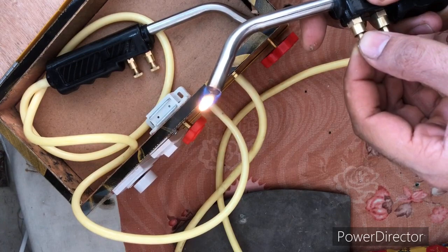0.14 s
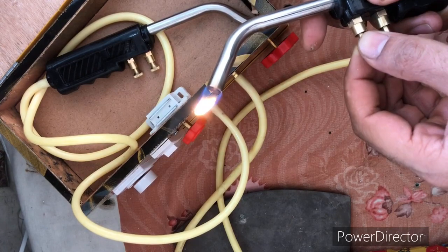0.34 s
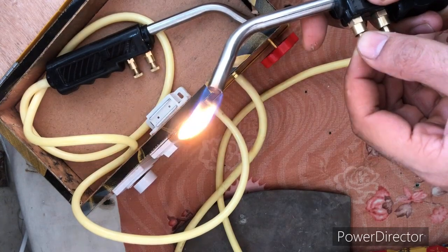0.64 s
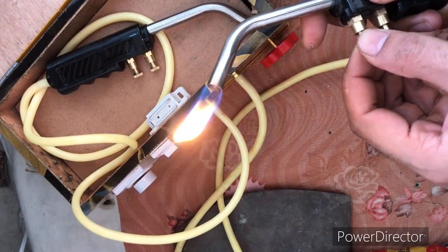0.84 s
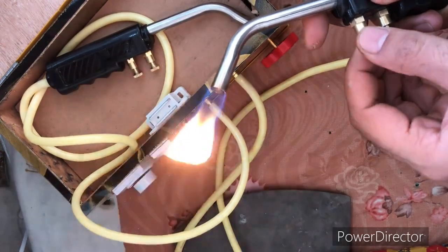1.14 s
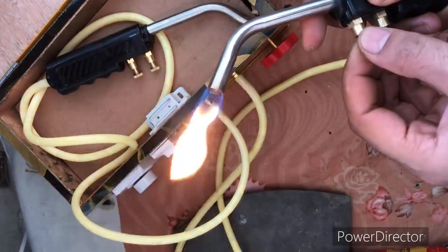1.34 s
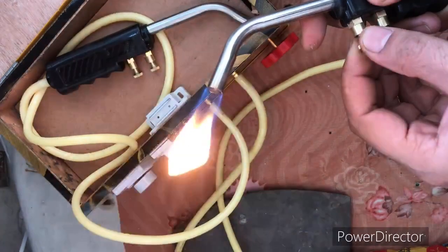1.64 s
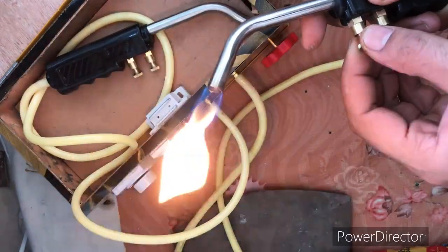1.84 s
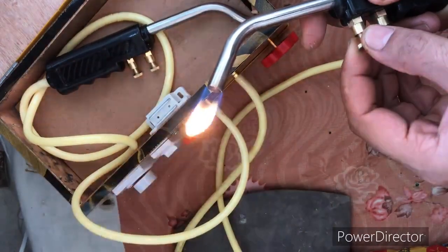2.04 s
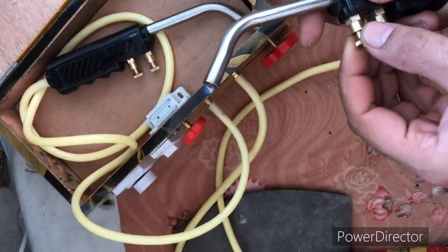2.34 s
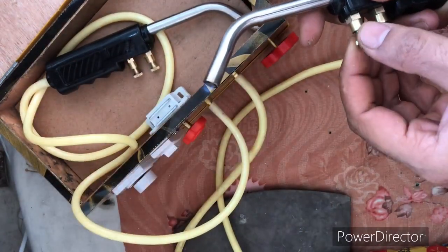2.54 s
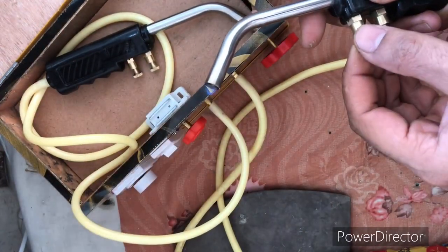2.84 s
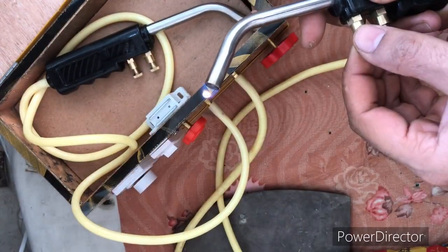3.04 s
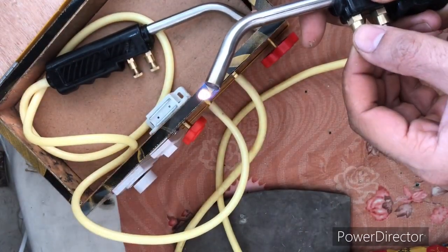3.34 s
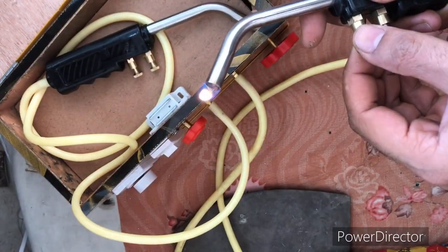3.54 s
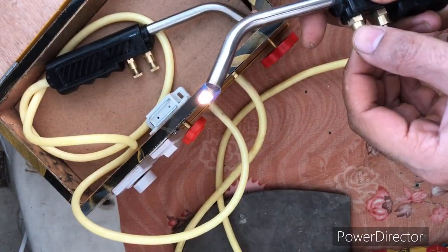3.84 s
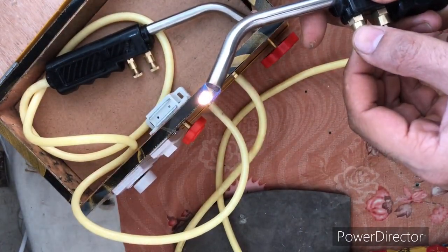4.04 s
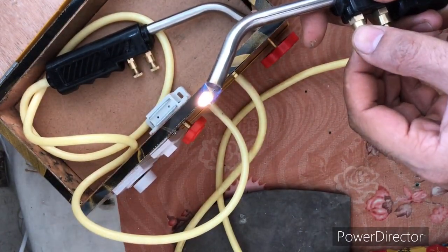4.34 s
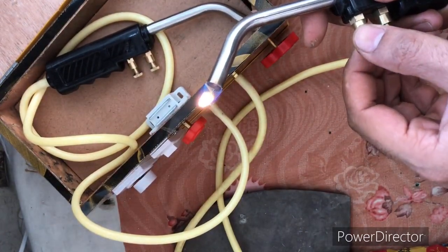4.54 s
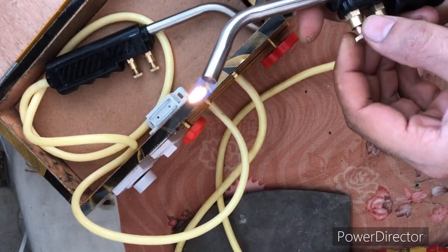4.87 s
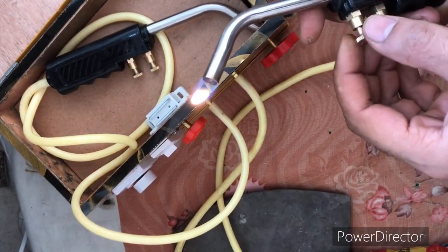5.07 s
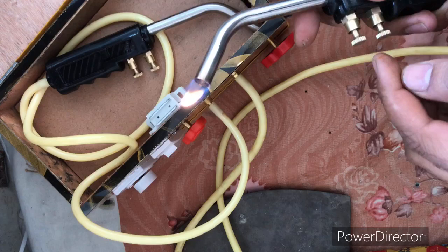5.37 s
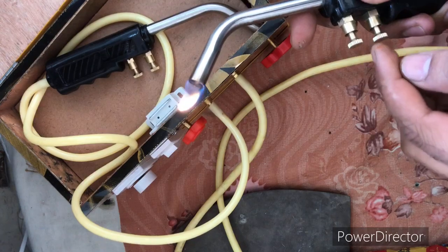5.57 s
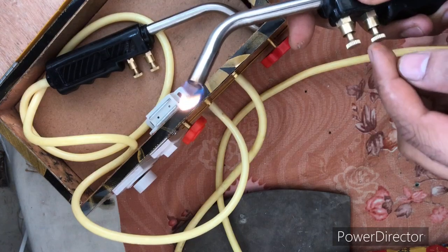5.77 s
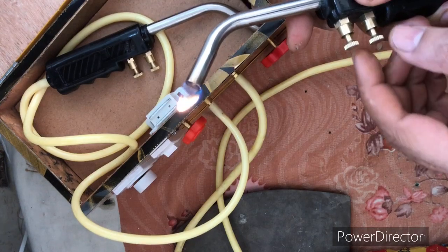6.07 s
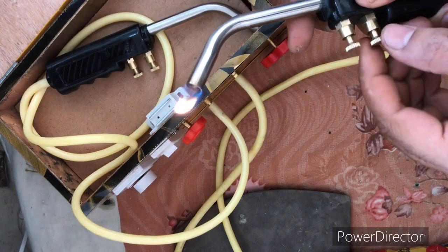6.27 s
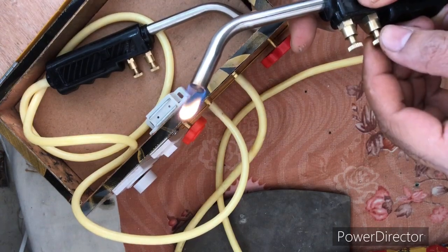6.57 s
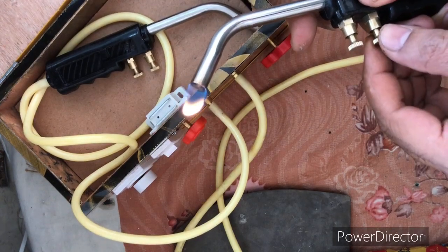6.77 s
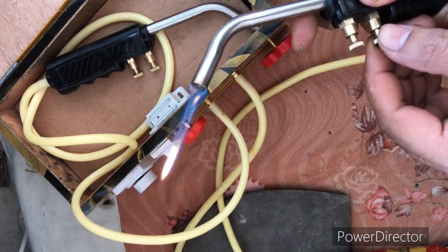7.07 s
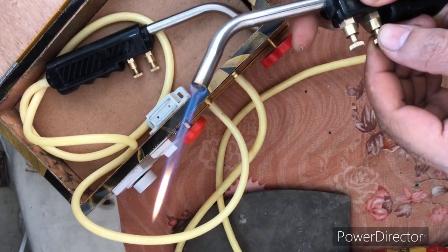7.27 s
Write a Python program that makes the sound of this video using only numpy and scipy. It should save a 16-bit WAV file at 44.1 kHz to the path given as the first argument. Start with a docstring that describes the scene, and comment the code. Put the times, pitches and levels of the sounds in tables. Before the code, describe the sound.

A gas torch is heard close, dry and in mono, over a continuous deep drone around 60 to 70 hertz, like a distant engine, beating against a steady mains pump hum. At about 0.35 s a short uneven rush of gas swells; from 0.5 to 2 s very faint high whistles accompany a buzzing, hollow ring of the burner tube around 690 hertz. Ragged low puffs flutter near 1.9 to 2.1 s, with a small one at 2.35. The drone dips near 2.7, then is strongest around 3.9 to 4.5 s, while another tube ring rises at 3.3 and fades by 4.5. The airy hiss and roar thicken gradually. After 5.2 s the drone sits lower and rougher, with a soft midrange swell. Around 6.6 s the nozzle briefly sings breathily; from 6.8 the tube rings again as the flame becomes a strong tearing jet until 7.4 s.

```python
"""A hand torch hisses and roars close up, from coloured noise, over a low sine drone like a distant engine.
First a valve lets out a rush of gas, then whistles as narrow noise bands while the flame lengthens and shrinks.
From 2.7 s the flame stretches, ever faster, into a tearing jet; ragged puffs and longer swells come and go.
The drone climbs, sinks and gains idle partials after 5.2 s; near 6.6 s the nozzle sings in a brief swell.
Throughout, a mains-driven pump hums and buzzes in mains harmonics, and the burner tube rings with its strokes."""
import sys
import numpy as np
from scipy import signal
from scipy.fft import rfft, irfft, next_fast_len
from scipy.io import wavfile

SR = 44100
rng = np.random.default_rng(int(sys.argv[2]) if len(sys.argv) > 2 else 0)


def inscribe(sig):
    """Save sig as 16-bit PCM at rate SR to the path in sys.argv[1].

    A 1-D sig is mono; a 2-D sig holds one channel per row.
    Samples are clipped to [-1, 1] before scaling.
    """
    pcm = np.round(np.clip(np.atleast_2d(sig).T, -1, 1) * 32767)
    wavfile.write(sys.argv[1], SR, pcm.astype(np.int16))


N = 326781
TIME = np.arange(N) / SR   # s

# Distant engine. Each row: time in seconds, firing rate in Hz, level in dB.
ENGINE_RUN = [(0, 63.1, -42.5), (.2, 62.8, -33), (.75, 68.2, -31.5), (1.3, 69.3, -33.5), (2.0, 69.6, -37.5),
              (2.2, 69.12, -33), (2.65, 70.85, -46), (3.0, 72, -39), (3.55, 73.6, -38.5),
              (3.85, 69.46, -28.5), (4.55, 66.77, -28), (4.9, 65.84, -34.5), (5.2, 63, -34.5),
              (5.45, 61.4, -32.5), (5.75, 59.86, -34.5), (6.45, 60.24, -31), (7.41, 60.1, -32.5)]
# Partials at idle. Each row: multiple of half the firing rate, level in dB against the firing tone.
IDLE_PARTIALS = [(1, -27), (3, -6)]
IDLE_START_S, IDLE_EDGE_S = 5.24, 0.21

MAINS_HZ = 50.04
# The pump's own hum. Each row: multiple of the mains, dB with a small flame, dB with a long flame.
PUMP_HUM = [(1, -28, -25.5), (2, -45, -44.5), (4, -53.5, -61), (11, -55, -64)]
# Buzz that the strokes drive in the flame. Each row: multiple of the mains, dB with a small flame,
# dB with a long flame, both before the buzz level of FLAME_SHAPE.
FLAME_BUZZ = [(5, -69, -60), (6, -61, -52.5), (7, -54.5, -55), (8, -78, -65.5), (9, -72.5, -71),
              (10, -62, -57), (12, -61, -57.5), (15, -61, -56), (16, -70, -64), (18, -61, -58),
              (19, -66.5, -53), (20, -66, -60.5), (21, -70, -71.5), (22, -68, -61), (24, -75, -79)]
# The burner tube catches and rings. Each row: start in seconds, end in seconds, attack in seconds,
# resonance at the start in Hz, level in dB at the start, fade in dB per second.
TUBE_RINGS = [(.08, .41, 0.12, 679, -55, 0), (0.495, 1.985, 0.19, 692.6, -46.5, 7),
              (1.953, 2.25, .1, 692, -47.5, 11), (3.275, 4.502, 0.35, 687, -45.5, 17),
              (6.8, 7.602, 0.32, 694, -49, 4)]
RING_RELEASE_S, RING_SAG_HZ_PER_S = 0.25, 19.4   # while it rings, its resonance sinks
TUBE_REST_HZ, TUBE_REST_DB = 666.5, -55.5   # it always rings faintly
TUBE_OPEN_HZ, TUBE_OPEN_S, TUBE_OPEN_TAKES_S = 683, 4.6, 0.5   # the faint ring moves up to here

# Puffs and longer swells of resonant noise in the flame and tube. Each row: peak time in seconds,
# length (Gaussian spread) in seconds, centre in Hz, width in Hz, level in dB.
NOISE_PUFFS = [(.29, 0.12, 135, 59.6, -44), (.32, 0.072, 1100, 600, -58), (1.901, 0.028, 176, 59.6, -40),
               (1.91, 0.032, 348, 77, -40), (2.053, 0.11, 765, 323, -47), (2.074, .045, 172, 60, -41.5),
               (2.343, 0.028, 652, 90, -53), (4.146, 0.15, 625, 40, -54.5), (5.45, 0.41, 450, 111, -54),
               (6.353, 0.39, 123, 69.93, -46)]

# Spectrum of the valve's rush of gas. Each row: frequency in Hz, relative dB per Hz.
RUSH_SPECTRUM = [(900, -20), (2000, -5), (3500, 1), (6000, -7), (7500, -22), (12000, -27)]
RUSH_PEAK_S, RUSH_RISE_S, RUSH_FALL_S, RUSH_DB = 0.35, 0.16, 0.1, -60
# Whistle modes of the nearly shut valve. Each row: centre in Hz, width in Hz, relative level in dB.
WHISTLE_MODES = [(4590, 130, -5), (5900, 250, -8), (8600, 90, -16), (12000, 160, -4), (14100, 130, -4),
                 (15300, 220, 0)]
# When it whistles. Each row: start in seconds, end in seconds, level in dB.
WHISTLING_SPELLS = [(.52, 1.19, -72), (1.3, 2.0, -70)]
WHISTLING_EDGE_S = 0.12

# Modes in which the nozzle sings. Each row: centre in Hz, width in Hz, relative level in dB.
SINGING_MODES = [(418, 42, -10), (960, 21, 1), (1360, 110, -7)]
SING_DB, SING_STRETCHED_DB = -66, -56.5   # always faint; added as the flame stretches
SING_START_S, SING_END_S, SING_EDGE_S, SING_SWELL_DB = 6.47, 6.77, 0.089, -56

# Flame spectra, from the low rumble up to the fine hiss. Each row: frequency in Hz, relative dB per Hz.
RUMBLE_SPECTRUM = [(15, -32), (32, -15), (45, -2.5), (65, 8), (85, -1), (110, -0.5), (140, -5.5),
                   (185, -9.5), (225, -21.5), (400, -32)]
ROAR_SPECTRUM = [(150, -35), (240, -1.5), (340, 0), (420, -5.5), (490, 1.5), (630, -1.5), (820, -4),
                 (960, -1.5), (1170, -7), (1450, -6), (1850, -11), (2200, -21), (3000, -29.5)]
JET_SPECTRUM = [(1200, -3.5), (2100, 0.5), (2700, -2), (3350, 1.5), (4100, -5), (4900, -9.5), (5500, -8),
                (6300, -6.5), (7100, -12), (7800, -21), (10000, -56)]
HISS_SPECTRUM = [(5000, -8), (7500, -3.5), (8600, 0.5), (9800, 0), (10400, -4), (11200, -.5), (13000, -0.5),
                 (14600, -1), (15600, 2)]
# Spectrum of the long tearing jet. Each row: frequency in Hz, relative dB per Hz.
TEARING_SPECTRUM = [(250, -7.5), (400, 2), (600, -1.5), (800, -1), (1350, -1), (1850, -4.5), (2200, -8.5),
                    (2700, -7), (3600, -16), (4800, -18.5), (5500, -16.5), (6500, -34)]
# Gas flow, of which only the swing about its mean counts. Each row: time in seconds, level in dB.
GAS_FLOW = [(0.6, -65), (1.16, -64.5), (2.15, -59.5), (2.24, -61), (3.19, -57), (4.63, -54.5), (5.9, -57.5),
            (6.76, -56), (7.3, -53)]
# The flame. Each row: time in seconds, length from 0 to 1, level of its buzz in dB.
FLAME_SHAPE = [(.45, 0, 1), (.95, 0.78, -1), (1.95, 0.59, 1), (2.45, 0.03, -4), (3.35, 0.1, -10),
               (3.9, 0.01, -1.5), (4.5, 0, -1.5), (5.1, 0, 3), (6.7, 0.01, 1), (7.1, 0.47, 2.5)]
# level at mean flow, and the share of the flow's dB swing that the layer follows
ROAR_DB, ROAR_FOLLOWS = -49.5, 0.57
JET_DB, JET_FOLLOWS = -57.5, 0.92
HISS_DB, HISS_FOLLOWS = -66, 0.71
RUMBLE_DB, LONG_FLAME_RUMBLE_DB = -38, -4.5   # with a small flame; change at length 1
STRETCH_START_S, STRETCH_POWER, TEARING_DB = 2.66, 2.17, -46   # full stretch comes at the very end
STRETCH_ROAR_DB, STRETCH_JET_DB, STRETCH_HISS_DB = -4, -3, 1.0   # changes at full stretch

CUTOFF_HZ = 15780


def from_db(db):
    """Decibels to gain."""
    return 10 ** (np.asarray(db) / 20)


def rms_one(x):
    """Scale to rms 1."""
    return x / np.sqrt(np.mean(x ** 2) + 1e-20)


def in_time(rows):
    """Draw each column of a curve table out to every sample."""
    seconds, *columns = np.transpose(rows)
    return [np.interp(TIME, seconds, column) for column in columns]


def rise(start, length):
    """A smooth step from 0 to 1."""
    return np.sin(np.pi / 2 * np.clip((TIME - start) / length, 0, 1)) ** 2


def held(start, end, attack, release):
    """Attack, hold, and a release centred on the end."""
    return rise(start, attack) * (1 - rise(end - release / 2, release))


def coloured(gain_at):
    """Noise of rms 1 whose spectrum follows a function of frequency."""
    size = next_fast_len(N)
    hz = np.maximum(np.arange(size // 2 + 1) * SR / size, 1)
    spectrum = rfft(rng.standard_normal(size)) * gain_at(hz)
    return rms_one(irfft(spectrum, size)[:N])


def shaped_noise(spectrum):
    """Turbulence with a given spectrum, falling away beyond its ends."""
    points, db = np.transpose(spectrum)

    def gain_at(hz):
        skirts = np.minimum(1, np.minimum(hz / points[0], points[-1] / hz)) ** 2
        return from_db(np.interp(np.log(hz), np.log(points), db)) * skirts
    return coloured(gain_at)


def resonant_noise(centre_hz, width):
    """Turbulence through one resonance, about its width across at the -3 dB points."""
    return coloured(lambda hz: 1 / (1 + ((hz - centre_hz) / (0.75 * width)) ** 2))


def drift(rate):
    """Slow random wander of rms 1, changing about rate times a second."""
    return coloured(lambda hz: 1 / (1 + (hz / rate) ** 4))


def tone(turns):
    """A sine of rms 1 that starts anywhere in its cycle."""
    return np.sqrt(2) * np.sin(2 * np.pi * (turns + rng.random()))


def engine(unsteady_db=1.0):
    """Only the lowest partials of the engine carry this far; they beat against the pump's hum."""
    firing_hz, level_db = in_time(ENGINE_RUN)
    turns = np.cumsum(firing_hz) / SR
    partials = sum(from_db(db) * tone(round(k) * turns / 2) for k, db in IDLE_PARTIALS)
    idling = rise(IDLE_START_S, IDLE_EDGE_S) * partials
    return from_db(level_db + unsteady_db * drift(rate=10.5)) * (tone(turns) + idling)


def stroke_phases(orders, db):
    """Phase of each harmonic of a pulse that starts sharply and rings out (minimum phase)."""
    log_gain = np.log(from_db(np.interp(np.arange(max(orders) + 1), orders, db)))
    mirrored = np.r_[log_gain, log_gain[-2:0:-1]]
    return -np.imag(signal.hilbert(mirrored))


def tube(harmonics, width_hz=22):
    """The burner tube lifts the stroke harmonics nearest its resonance, which sinks in each ring."""
    def ring(hz):
        lifts = {k: 1 / (1 + ((k * MAINS_HZ - hz) / width_hz) ** 2) for k in harmonics}
        lifted = sum(lifts[k] * harmonics[k] for k in harmonics)
        return lifted / np.sqrt(sum(lift ** 2 for lift in lifts.values()))

    rest_hz = TUBE_REST_HZ + (TUBE_OPEN_HZ - TUBE_REST_HZ) * rise(TUBE_OPEN_S, TUBE_OPEN_TAKES_S)
    out = from_db(TUBE_REST_DB) * ring(rest_hz)
    for start, end, attack, hz, db, fade in TUBE_RINGS:
        age = np.clip(TIME - start, 0, end - start)
        envelope = held(start, end, attack, RING_RELEASE_S) * from_db(db - fade * age)
        out = out + envelope * ring(hz - RING_SAG_HZ_PER_S * age)
    return out


def pump(waver_db=1.3, tube_peak_db=-43.5, first_stroke_s=0.00196):
    """The pump hums; each stroke jolts the flame into a buzz and sets the burner tube ringing."""
    turns = MAINS_HZ * (TIME - first_stroke_s)
    length, buzz_db = in_time(FLAME_SHAPE)

    def blend(small, long):
        return small + (long - small) * np.clip(length, 0, 1)

    # the hum crests half a cycle after each stroke
    hum = sum(from_db(blend(small, long)) * np.cos(2 * np.pi * round(k) * (turns - 0.5))
              for k, small, long in PUMP_HUM)

    tube_orders = (13, 14)   # the mains multiples next to the tube's resonance
    levels = [(round(k), long) for k, small, long in FLAME_BUZZ]
    levels += [(k, tube_peak_db) for k in tube_orders]   # here this level only sets the phases
    phases = stroke_phases(*zip(*sorted(levels)))

    def harmonic(k):
        return np.cos(2 * np.pi * round(k) * turns + phases[round(k)])

    buzz = sum(from_db(blend(small, long) + buzz_db + waver_db * drift(rate=3.1)) * harmonic(k)
               for k, small, long in FLAME_BUZZ)
    ringing = tube({k: harmonic(k) for k in tube_orders})
    return np.sqrt(2) * (hum + buzz + ringing)   # cosines to rms 1


def puffs(ragged_db=2.5):
    """Ragged puffs and longer swells of resonant noise in the flame and tube."""
    swells = sum(from_db(db) * np.exp(-0.5 * ((TIME - peak) / length) ** 2) * resonant_noise(hz, width)
                 for peak, length, hz, width, db in NOISE_PUFFS)
    return from_db(ragged_db * drift(rate=10.4)) * swells


def valve(spurt_db=2.5):
    """Gas squeezes past the needle: a short uneven rush, then thin whistles as it is nearly shut."""
    spread = np.where(TIME < RUSH_PEAK_S, RUSH_RISE_S, RUSH_FALL_S)
    swell = np.exp(-0.5 * ((TIME - RUSH_PEAK_S) / spread) ** 2)
    rush = swell * from_db(RUSH_DB + spurt_db * drift(rate=30)) * shaped_noise(RUSH_SPECTRUM)
    whistles = rms_one(sum(from_db(db) * resonant_noise(hz, width) for hz, width, db in WHISTLE_MODES))
    whistling = sum(from_db(db) * held(start, end, WHISTLING_EDGE_S, WHISTLING_EDGE_S)
                    for start, end, db in WHISTLING_SPELLS)
    return rush + whistling * whistles


def nozzle(stretch):
    """The nozzle sings in its modes under the fast flame, as narrow bands of noise."""
    swell = held(SING_START_S, SING_END_S, SING_EDGE_S, SING_EDGE_S)
    gain = from_db(SING_DB) + stretch * from_db(SING_STRETCHED_DB) + swell * from_db(SING_SWELL_DB)
    return gain * sum(from_db(db) * resonant_noise(hz, width) for hz, width, db in SINGING_MODES)


def flame(flutter_db=0.77, surge_db=0.9, jet_flutter=0.49):
    """Burning gas rumbles, roars and tears; its jet hisses. Roar, jet and hiss grow with the gas flow."""
    flow_db, = in_time(GAS_FLOW)
    flow_db = flow_db - flow_db.mean()
    length, _ = in_time(FLAME_SHAPE)
    stretch = np.clip((TIME - STRETCH_START_S) / (TIME[-1] - STRETCH_START_S), 0, 1) ** STRETCH_POWER
    flutter = flutter_db * drift(rate=16)   # the flame front flaps
    surge = surge_db * np.sin(2 * np.pi * MAINS_HZ * TIME)   # the roar swells after each pump stroke

    rumble_db = RUMBLE_DB + LONG_FLAME_RUMBLE_DB * length
    roar_db = ROAR_DB + ROAR_FOLLOWS * flow_db + STRETCH_ROAR_DB * stretch + flutter + surge
    jet_db = JET_DB + JET_FOLLOWS * flow_db + STRETCH_JET_DB * stretch + jet_flutter * flutter
    hiss_db = HISS_DB + HISS_FOLLOWS * flow_db + STRETCH_HISS_DB * stretch + jet_flutter * flutter

    rumble = from_db(rumble_db) * shaped_noise(RUMBLE_SPECTRUM)
    roar = from_db(roar_db) * shaped_noise(ROAR_SPECTRUM)
    jet = from_db(jet_db) * shaped_noise(JET_SPECTRUM)
    hiss = from_db(hiss_db) * shaped_noise(HISS_SPECTRUM)
    tearing = stretch * from_db(TEARING_DB + flutter) * shaped_noise(TEARING_SPECTRUM)
    return rumble + roar + jet + hiss + tearing + nozzle(stretch)


def scene():
    """Mix engine, pump, puffs, valve and flame into one channel."""
    return (engine() + pump() + puffs() + valve() + flame())[None]


def record(dry):
    """The sound eases in and out over 4 ms; the top is cut steeply."""
    from_edge_s = np.minimum(TIME, TIME[-1] - TIME)
    ease = np.sin(np.pi / 2 * np.clip(from_edge_s / 0.004, 0, 1)) ** 2
    # order 12, 0.1 dB ripple below the cutoff, 90 dB down above it
    low_pass = signal.ellip(12, 0.1, 90, CUTOFF_HZ, fs=SR, output="sos")
    return signal.sosfilt(low_pass, dry * ease)


dry = scene()
out = record(dry)
inscribe(out)
```